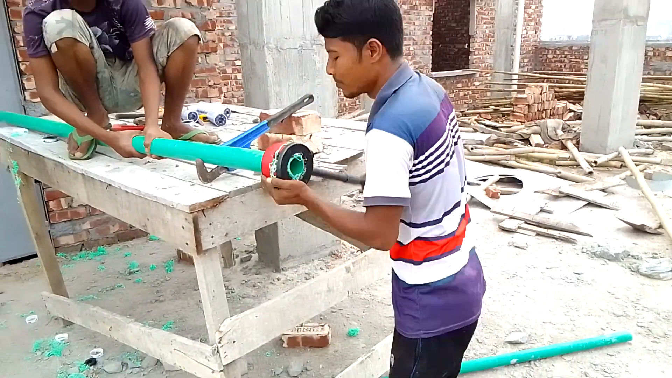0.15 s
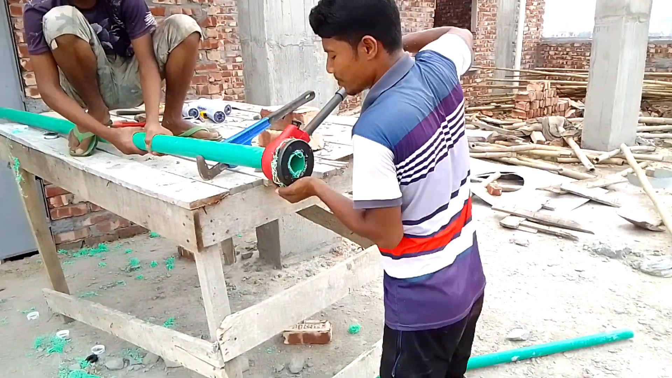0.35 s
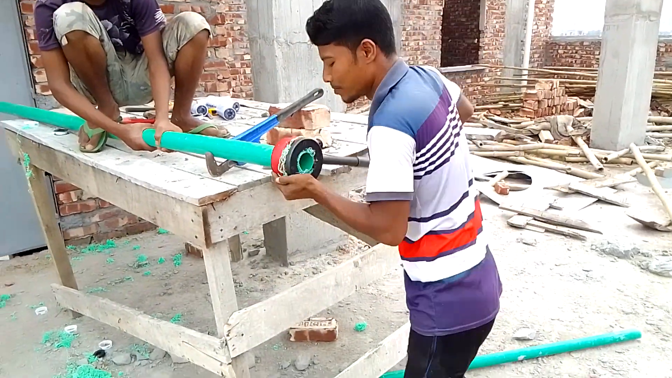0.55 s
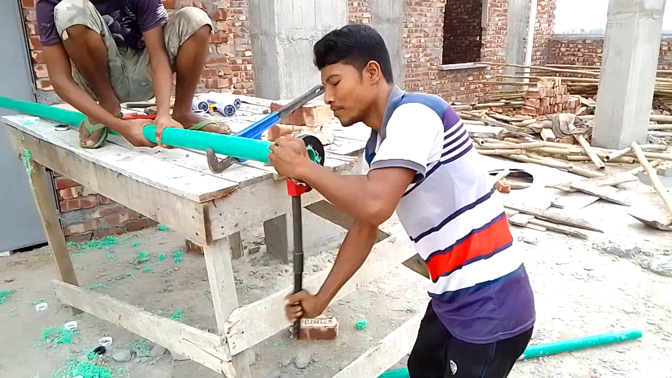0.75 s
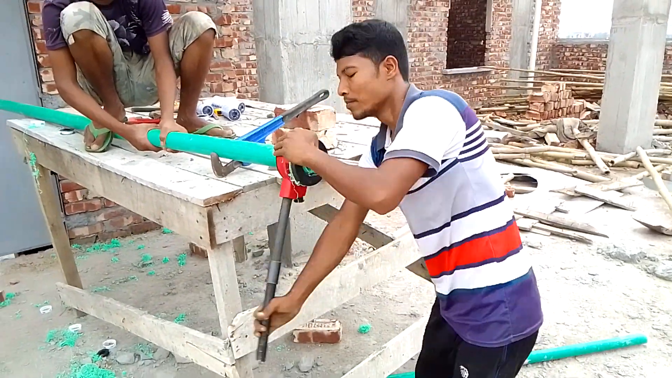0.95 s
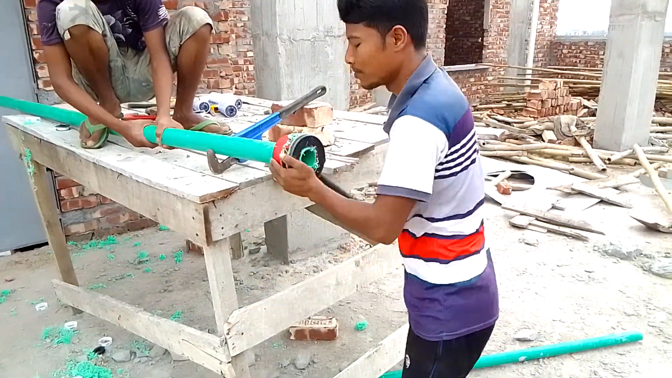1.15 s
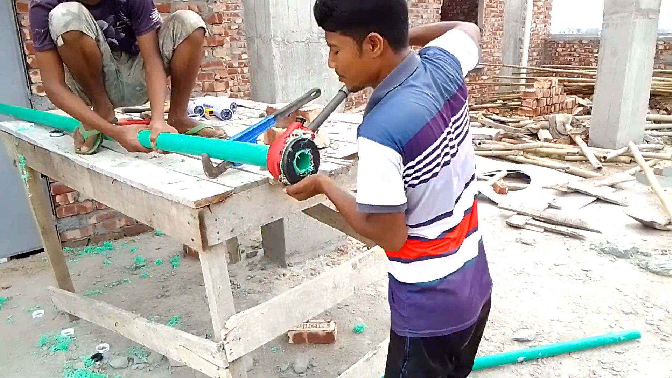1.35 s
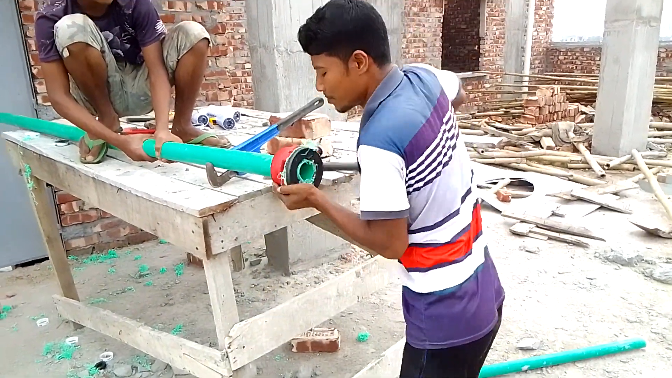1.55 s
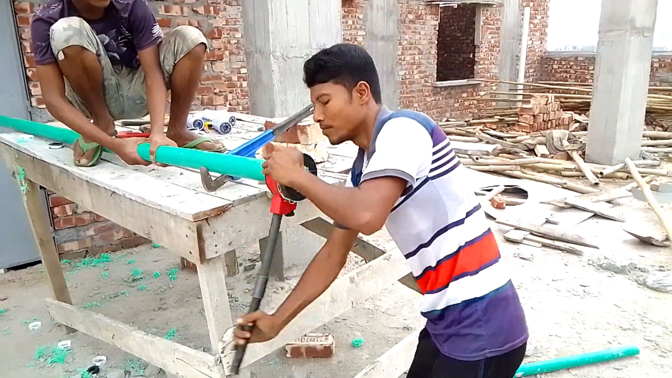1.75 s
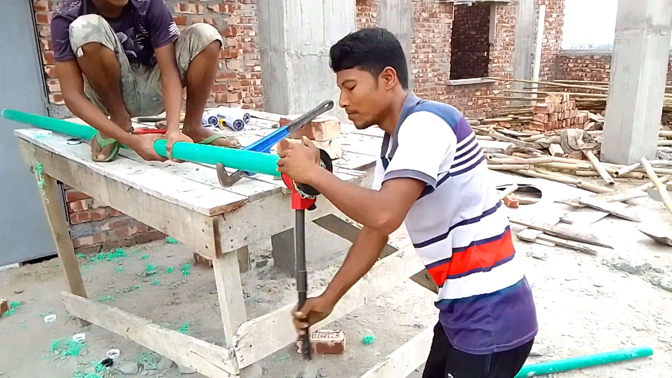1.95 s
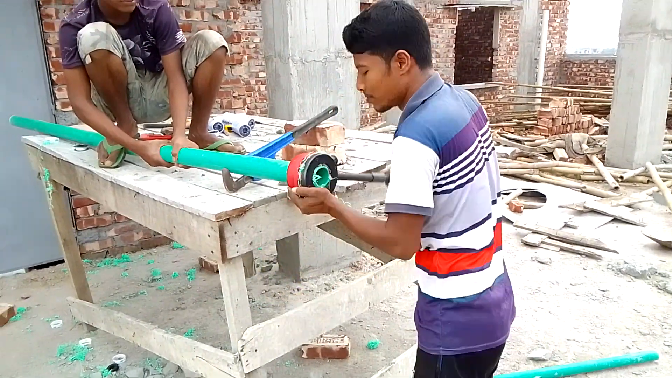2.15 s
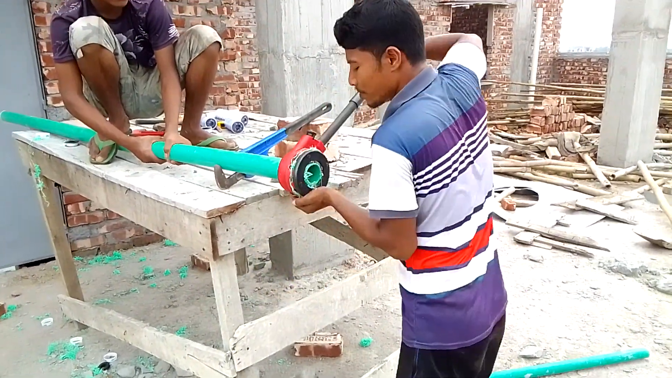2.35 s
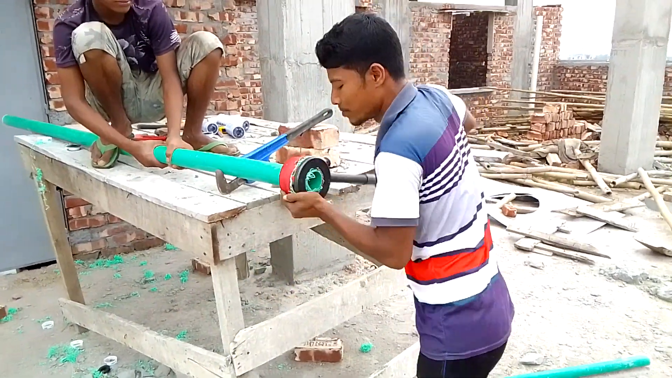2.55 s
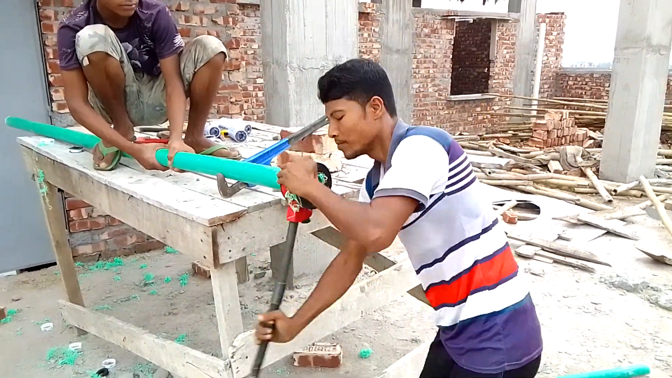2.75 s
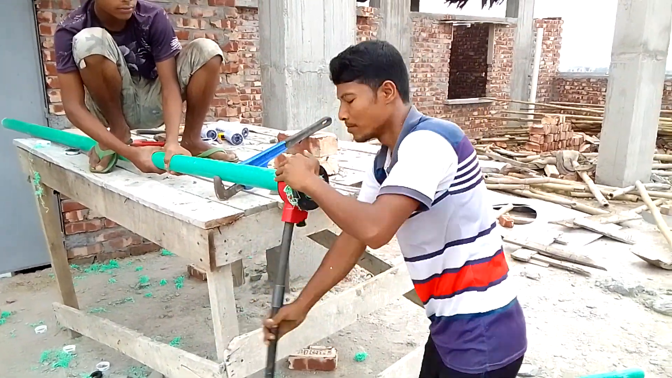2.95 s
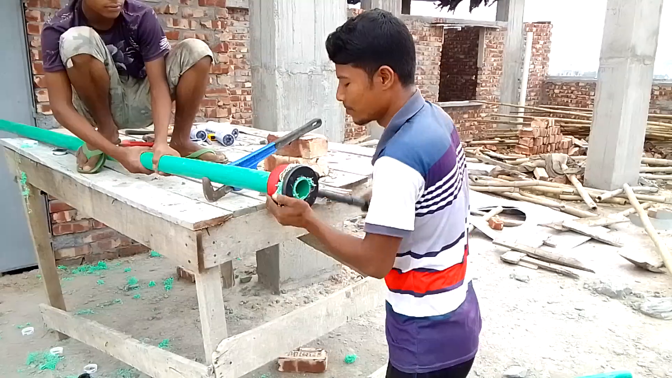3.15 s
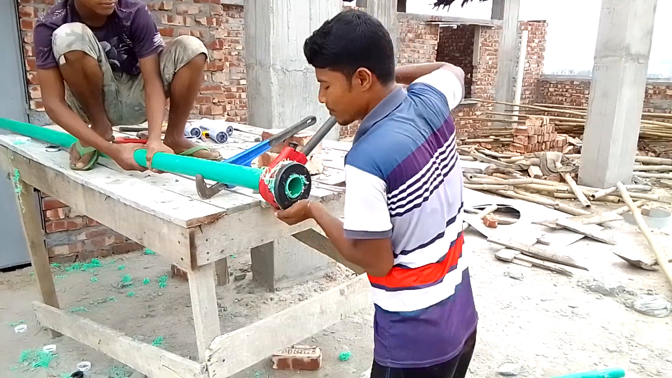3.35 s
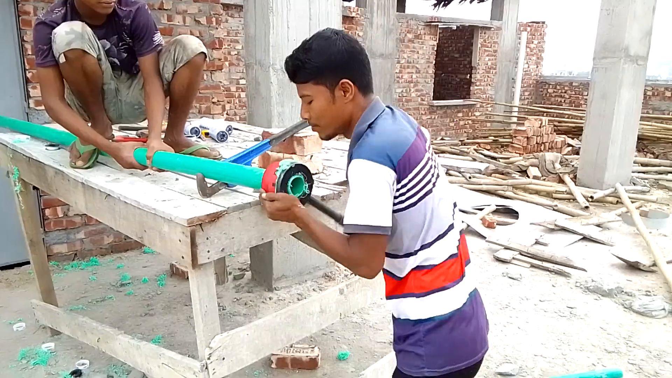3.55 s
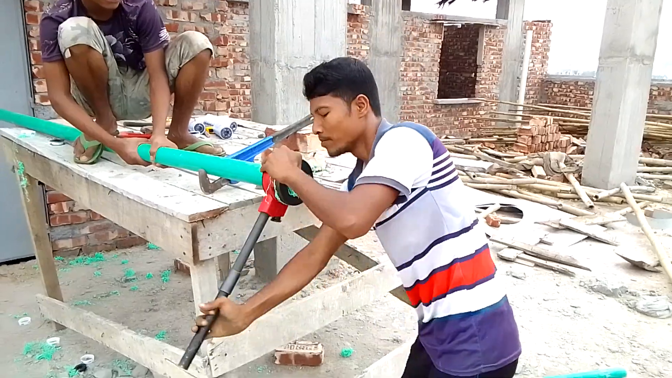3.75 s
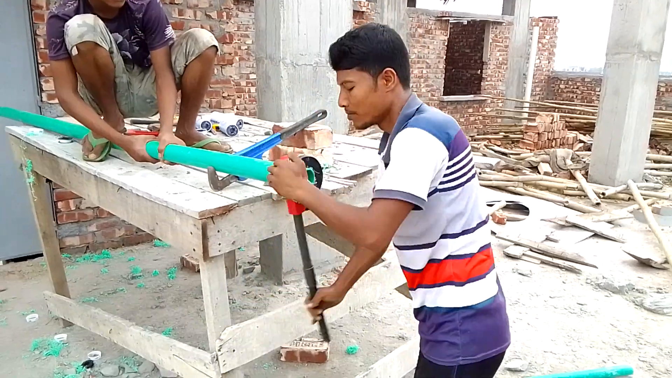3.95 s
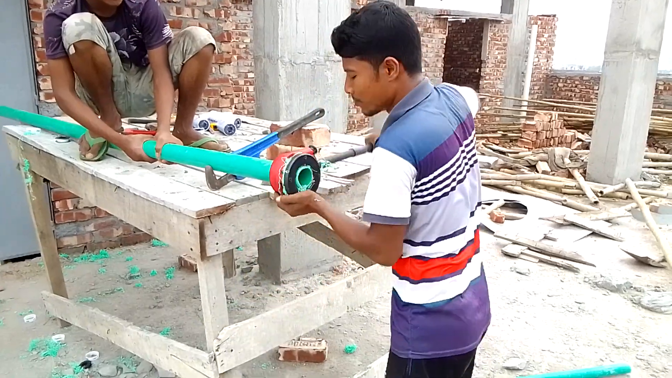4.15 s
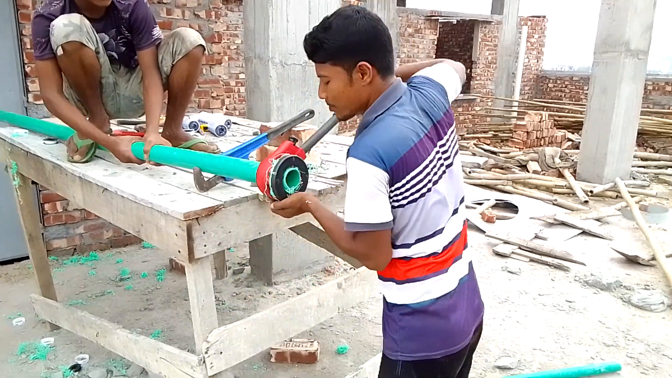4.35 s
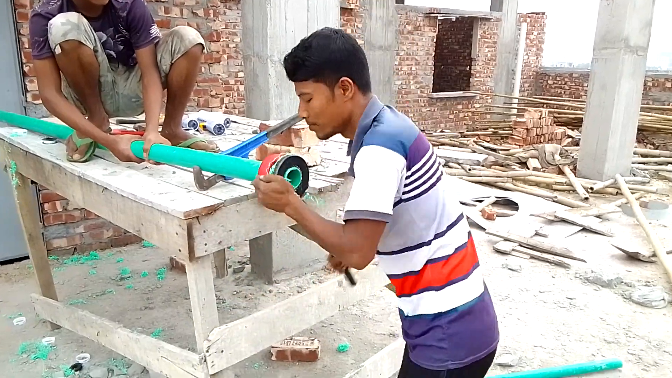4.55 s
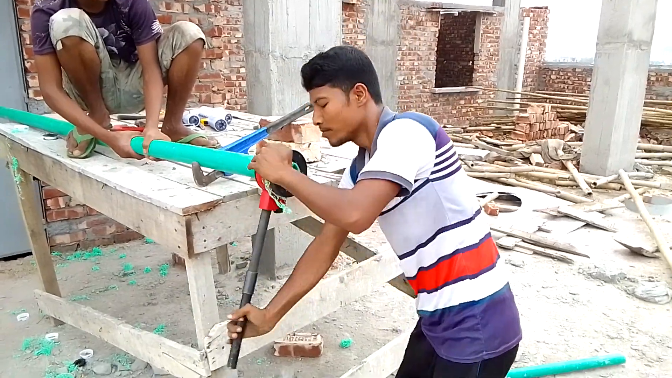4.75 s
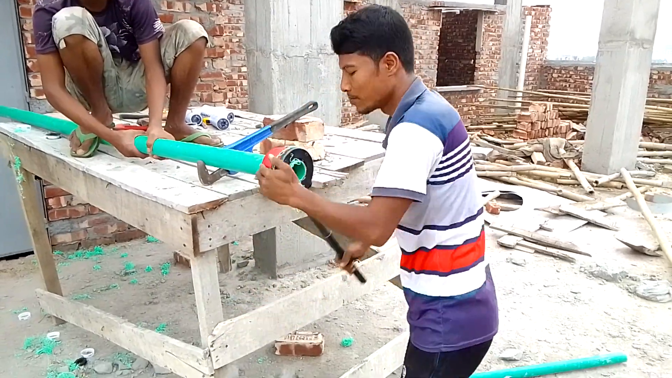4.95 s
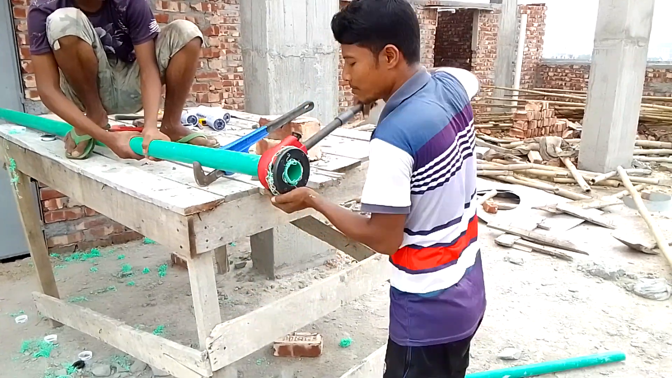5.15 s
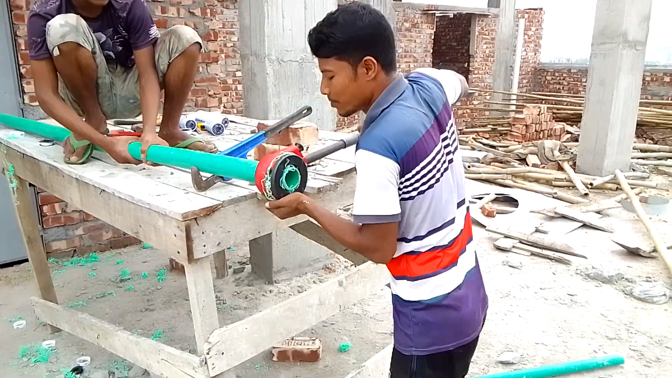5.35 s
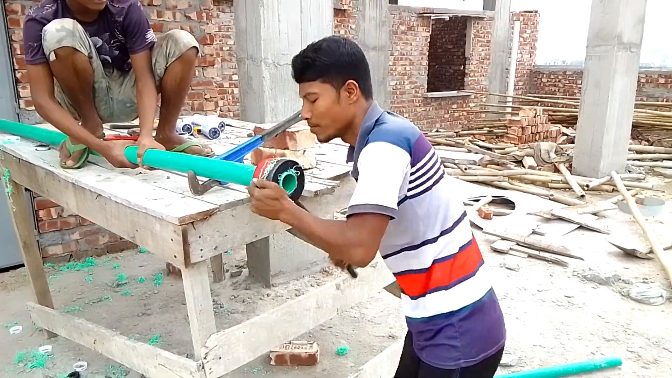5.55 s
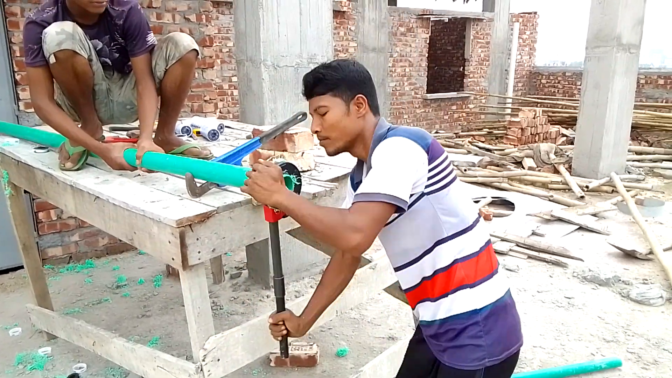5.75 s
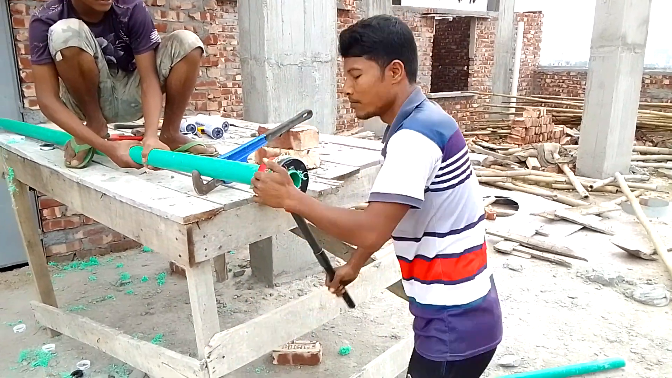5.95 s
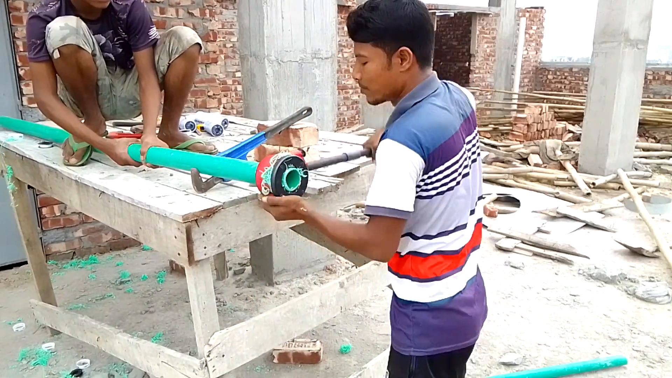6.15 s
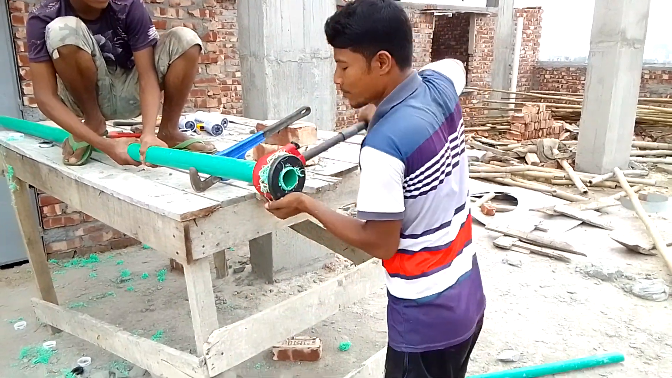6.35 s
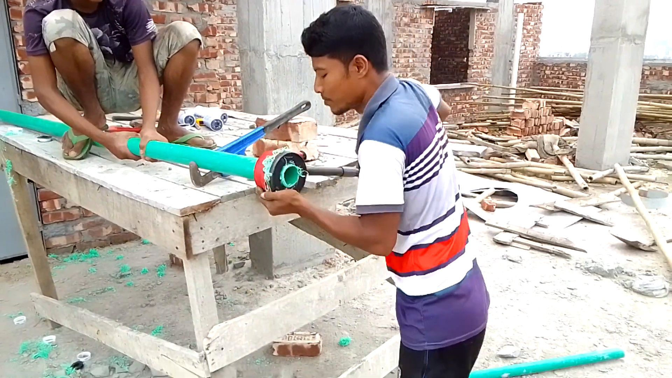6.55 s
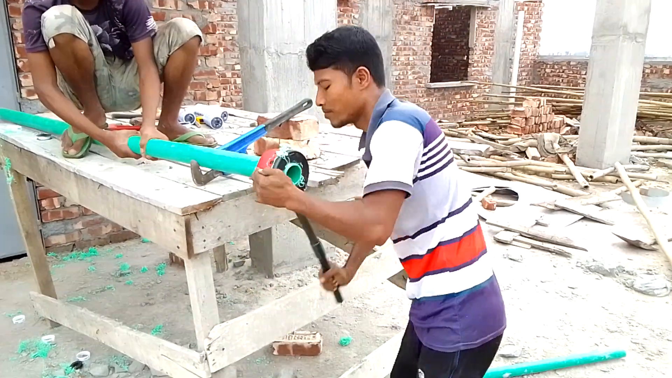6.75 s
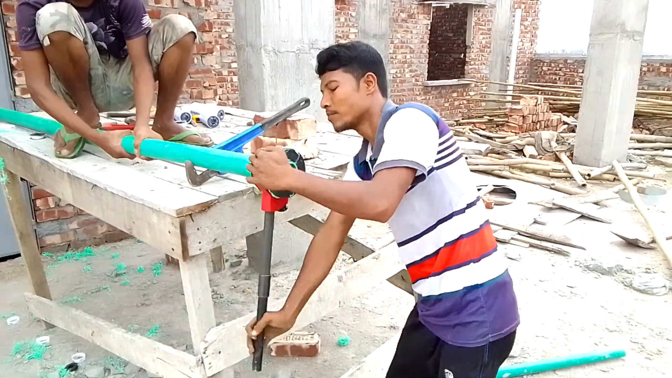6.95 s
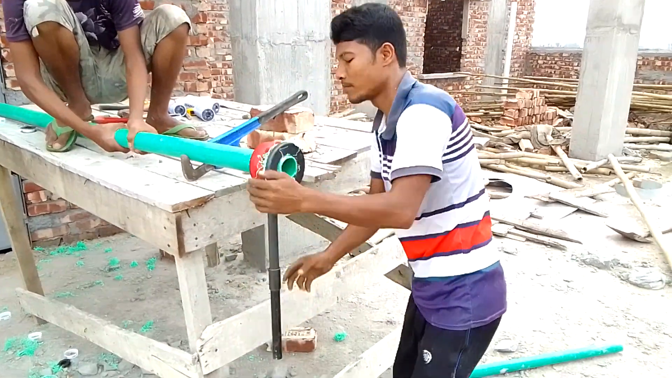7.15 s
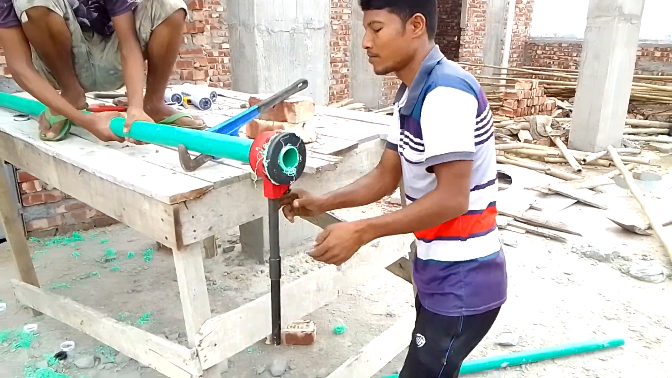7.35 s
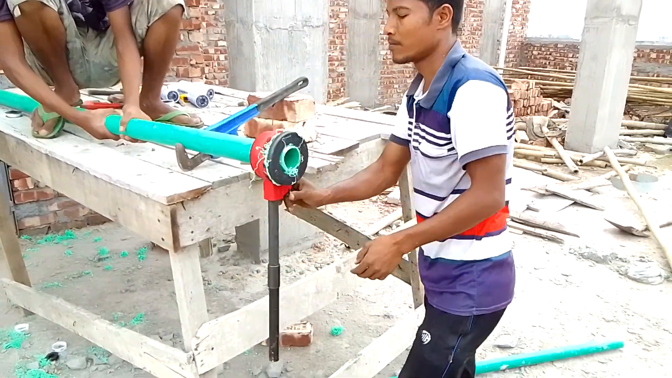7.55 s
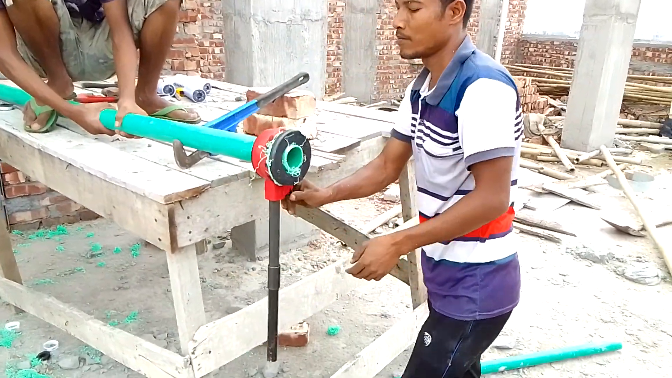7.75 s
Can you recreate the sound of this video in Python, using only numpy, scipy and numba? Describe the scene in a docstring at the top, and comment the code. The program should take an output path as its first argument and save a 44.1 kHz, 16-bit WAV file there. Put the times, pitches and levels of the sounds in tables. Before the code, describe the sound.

Seven rapid ratchet clatters, each followed by a coarse scraping stroke as the die bites into plastic, run in a steady work rhythm. Steel rings sharply with clacks and hollow pipe knocks at the turns, and the bench creaks under load. The microphone is near, in an open brick shell with a short bright echo. After seven seconds it nearly stops, leaving light scuffs, thin distant tones and muted air.

```python
"""In an open brick shell, a ratchet die threader is worked on a plastic pipe held on a wooden bench.
On each back swing the pawl drops over the teeth: short noise bursts ring the steel head.
On each down stroke the die rasps through plastic: dense tiny slips, filtered by the pipe, with bench creaks
around the strokes. Near the end come a groan, light scuffs and thin far tones. Bare walls answer briefly,
over distant air and rumble made of filtered noise."""
import sys
import numpy as np
from scipy import signal
from scipy.fft import rfft, irfft
from scipy.io import wavfile
from scipy.ndimage import uniform_filter1d
from numba import njit

SR = 44100
rng = np.random.default_rng(int(sys.argv[2]) if len(sys.argv) > 2 else 0)


def dump(signal):
    """Clip the signal to [-1, 1] and save it as 16-bit WAV at the path in sys.argv[1]."""
    limited = np.clip(np.atleast_2d(signal).T, -1, 1)
    pcm = np.round(limited * 32767).astype(np.int16)
    wavfile.write(sys.argv[1], SR, pcm)


N = 343980
TIME = np.arange(N) / SR

# Open air of the site. Each row: frequency in Hz, relative level in dB.
AIR_COLOUR = [(150, -9.5), (300, -9), (700, -17.5), (1400, -11), (2800, -20), (5500, -35.5), (8000, -28.5),
              (11000, -48.5)]
# Slow changes of the low rumble. Each row: time in seconds, level in dB before the trim in site().
RUMBLE_LEVEL = [(0, -56), (.6, -90), (1.1, -52.5), (1.9, -70.5), (5.5, -69.5), (6.0, -54), (6.6, -61),
                (7.4, -57.5), (7.8, -66)]
# Tone of the rumble. Each row: frequency in Hz, relative level in dB.
RUMBLE_COLOUR = [(20, -9.5), (45, -5.5), (75, 3.5), (120, 1), (200, -11), (500, -46)]

# Cutting strokes. Each row: time the die bites in seconds, swell length in seconds, hold length in seconds,
# fall in dB per second, rasp level in dB, chip hiss level in dB (both levels before the trims in die_cutting()).
STROKES = [(-.4, 0.32, 0.16, 194, -51, -65), (0.667, 0.13, 0.18, 168.5, -36, -59),
           (1.593, 0.17, 0.16, 220.5, -37, -54), (2.667, 0.14, 0.16, 243, -34.5, -52.5),
           (3.578, 0.079, 0.24, 276.5, -37.5, -59), (4.512, 0.11, 0.2, 261.5, -38, -51),
           (5.543, .16, 0.041, 128, -37, -59.5), (6.792, 0.19, 0.025, 147, -33, -56)]
SWELL_DB_PER_S = 102.5  # how fast the rasp grows from the bite to full speed
# Pipe wall under the die. Each row: frequency in Hz, relative level in dB.
PIPE_COLOUR = [(100, -50), (450, -23), (720, -11.5), (1000, -0.5), (1400, 1.5), (1650, -4), (2100, -1),
               (2700, -6), (3300, -30.5), (4500, -57), (9000, -49.5)]
# Pipe resonances. Each row: frequency in Hz, width in Hz, strength in dB against the pipe colour.
PIPE_MODES = [(970, 63, 6), (1296, 79, 6), (1890, 110, 3.5)]
# Thin hiss of the shavings. Each row: frequency in Hz, relative level in dB.
CHIP_COLOUR = [(2000, -14.5), (3300, 8.5), (4300, -3), (5000, 3), (5800, -5), (7000, -2), (7900, 2),
               (9000, -15.5), (11500, -24.5), (16000, -23)]
# Wooden bench under load. Each row: frequency in Hz, relative level in dB.
BENCH_COLOUR = [(25, -14), (60, -14), (105, 0.5), (180, -3), (330, 1), (450, 3), (600, -3.5), (800, -2),
                (1300, -4.5), (3000, -45)]
# The chatter climbs from slow to fast, arriving a little before the stroke eases off; it also wavers.
CHATTER_SLOW_HZ, CHATTER_FAST_HZ = 1026, 1265
CHATTER_GLIDE_S, CHATTER_LEAD_S = 0.083, 0.11
# Sound thrown back by the surroundings. Each row: frequency in Hz, relative level in dB.
WALL_COLOUR = [(150, -14), (600, -3.5), (1300, -9), (2000, -1.5), (4200, -0.5), (4850, -5.5), (5600, -2.5),
               (8000, -2.5), (15000, -2)]

# The loose head shifts on the pipe when the handle turns round. Each row: time in seconds,
# then steel ring, housing clack and pipe knock in dB, before SHIFT_DB is added.
HEAD_SHIFTS = [(0.12, -37.5, -32, -31.5), (1.141, -36.5, -34, -42), (1.173, -56, -41, -38),
               (2.086, -42, -42, -43), (2.11, -52.5, -40.5, -40), (2.589, -42, -44, -50),
               (3.094, -29, -27, -35.5), (3.127, -39, -32.5, -34.5), (3.59, -24, -30.5, -38.5),
               (4.035, -35.5, -35.5, -40), (4.062, -42, -36, -38), (4.532, -25, -33.5, -32),
               (5, -35.5, -32.5, -33), (5.814, -42, -37.5, -33.5), (5.951, -35, -39, -46.5),
               (6.07, -42, -41.5, -39.5), (6.506, -42, -44, -63), (6.553, -51, -55, -53),
               (6.629, -90, -74.5, -47.5)]
# The next five tables each hold one row of five values: steel ring, bright tick, housing clack, pipe knock,
# bench thump. First, the level in dB added to every shift of the head.
SHIFT_DB = (-2, -3.5, 1, 0, -13)
# An ordinary pawl drop, in dB.
DROP_DB = (-22, -26, -26, -28.5, -36.5)
# Share (no unit) of the first accent, when the swing starts with a jerk.
FIRST_SHARE = (0.58, .4, 0.72, 0.68, 0.11)
# Share (no unit) of the last accent, when the handle is stopped.
LAST_SHARE = (0.61, .3, 0.11, 1.29, 0.17)
# Random spread from one pawl drop to the next, in dB.
DROP_SPREAD_DB = (1.6, 0.95, 1.2, 1.9, 1.8)
# Back swings of the handle. Each row: first tooth in seconds, last tooth in seconds, number of teeth,
# braking as the share by which the last gap grows, accent of the first drop in dB, accent of the last drop in dB,
# then level changes in dB for steel ring, bright tick, housing clack and pipe knock.
SWINGS = [(0.175, 0.459, 7, .29, 5, 0.5, 0, 0.5, -0.5, 2),
          (1.204, 1.538, 8, 0.73, 9, 10.5, -1, -.5, -3, -3),
          (2.141, 2.458, 8, 0.54, 0, 4, 0.5, 1, -1.5, 1.5),
          (3.155, 3.444, 8, 0.46, 11.5, 3, -1, -2, -0.5, -2), (4.090, 4.4, 8, .45, 3, 0, 0, 1, -1.5, 0.5),
          (5.062, 5.35, 7, 0.25, 0, -1, 1.5, 1.5, -0.5, 1.5),
          (6.157, 6.382, 5, .08, 9.5, 0.5, 1.5, 1.5, -1.5, -.5)]
# The first gap between teeth grows by this share; starting and braking fade by SWING_EASE per tooth.
SWING_START, SWING_EASE = .06, .34
# Ringing of the head on its pipe. Each row: frequency in Hz, width in Hz, strength in dB
# against the contact colour (frequency and strength vary a little with each drop).
HEAD_MODES = [(1305, 120, 13.5), (2153, 250, 9), (2300, 89, 9), (2590, 270, 15.5), (2760, 630, 10),
              (4030, 54, -8), (4900, 48, 19), (4998, 110, 24), (5130, 200, 9), (7650, 350, -2.5),
              (8337, 120, 15.5), (10860, 68, 17.5), (13900, 83, 6.5), (15100, 150, -0.5), (15700, 130, 8)]
# Broad tone of steel contact. Each row: frequency in Hz, relative level in dB.
CONTACT_COLOUR = [(25, -9), (100, -4.5), (350, -4), (650, -4.5), (1000, -3.5), (2000, -8.5), (3200, -14),
                  (5300, -10), (6200, -14.5), (7700, -7), (9000, -16.5), (11500, -21.5), (16000, -11.5)]
# Rattle of the loose dies. Each row: frequency in Hz, relative level in dB.
RATTLE_COLOUR = [(150, -13), (600, -8), (1200, 2), (2700, 0), (3600, -6.5), (5000, -10.5), (8000, -16),
                 (15000, -22.5)]

# The bench creaks as it takes or sheds load. Each row: start in seconds, length in seconds, relative level in dB.
CREAKS = [(0.582, 0.059, -41.5), (1.093, .07, -49.5), (1.601, 0.078, -55), (2.572, 0.057, -44),
          (3.61, 0.025, -39.5), (4.545, 0.066, -46.5), (5.475, 0.052, -41), (5.808, .06, -37.5),
          (5.935, .2, -50.5), (6.481, 0.025, -46.5), (6.539, 0.028, -47), (6.619, 0.018, -48.5)]
# Groan of the last slow stroke. Each row: time in seconds, pitch in Hz, level in dB.
GROAN = [(6.66, 326, -64), (6.76, 290, -52.5), (6.841, 402, -49), (6.908, 440, -43), (6.97, 510, -61),
         (7.04, 484, -56)]
# Small scuffs as the tool is let go. Each row: time in seconds, level in dB.
SCUFFS = [(7.15, -61.5), (7.348, -68.5), (7.614, -62), (7.643, -68), (7.67, -57.5)]
# Faint tones from far across the site. Each row: start in seconds, end in seconds, middle pitch in Hz,
# middle level in dB (both waver).
FAR_TONES = [(7.219, 7.50, 3660, -76), (7.432, 7.82, 1710, -71.5)]
# Microphone treble, with a deep notch from its port. Each row: frequency in Hz, level in dB.
MICROPHONE_COLOUR = [(7000, -2.5), (8400, -2.5), (9000, -5), (9600, -14), (10150, -18.5), (10750, -5),
                     (11300, -5.5), (12500, -6)]
TOP_HZ = 15600  # where the treble is cut off


def undb(db):
    """Turn decibels into gain."""
    return 10 ** (np.asarray(db) / 20)


def unit(x):
    """Scale to an average strength (rms) of 1."""
    return x / np.sqrt(np.mean(x ** 2) + 1e-20)


def colour(x, points, modes=()):
    """Filter by a broad colour with resonances on it; nothing sounds before its cause, so hits stay sharp."""
    f = np.fft.rfftfreq(len(x), 1 / SR) + 1
    hz, db = np.transpose(points)
    broad = undb(np.interp(np.log(f), np.log(hz), db))
    peaks = 1 + sum(undb(d) ** 2 / (1 + (2 * (f - c) / w) ** 2) for c, w, d in modes)
    # folding the cepstrum gives the minimum-phase filter of this shape
    cepstrum = irfft(np.log(broad * np.sqrt(peaks)))
    cepstrum[1:len(x) // 2] *= 2
    cepstrum[len(x) // 2 + 1:] = 0
    return irfft(rfft(x) * np.exp(rfft(cepstrum)), len(x))


@njit
def resonate(x, hz, width):
    """Ring one resonance (a state-variable band-pass) whose pitch can move; width is in Hz."""
    y, band, low = np.empty(len(x)), 0., 0.
    for i in range(len(x)):
        g, k = np.tan(np.pi * hz[i] / SR), width / hz[i]
        v = (band + g * (x[i] - low)) / (1 + g * (g + k))
        band, low, y[i] = 2 * v - band, low + 2 * g * v, k * v
    return y


def walk(rate):
    """Smooth random wandering with a spread near 1, from this many new values per second."""
    k = max(int(SR / rate), 2)
    steps = np.repeat(rng.standard_normal(N // k + 1), k)
    return 1.3 * uniform_filter1d(uniform_filter1d(steps, k), k)[:N]


def slips(rate, spread_db):
    """Surfaces stick and slip: random tiny clicks of uneven size, this many per second on average."""
    clicks = (rng.random(N) < rate / SR) * rng.choice([-1, 1], N)
    return clicks * undb(spread_db * rng.standard_normal(N))


def add(track, s, sound):
    """Mix a sound in at time s in seconds."""
    i = max(int(s * SR), 0)
    track[i:i + len(sound)] += sound[:N - i]


def gate(start, end, attack_s, release_s):
    """Rise from start, hold until end, then fade."""
    return np.clip((TIME - start) / attack_s, 0, 1) * np.exp(-np.maximum(TIME - end, 0) / release_s)


def site(air_db=-64, rumble_db=-1):
    """Distant outdoor wash over a wavering rumble, both filtered noise."""
    air = unit(colour(rng.standard_normal(N), AIR_COLOUR)) * undb(air_db + walk(2.0))
    rumble = unit(colour(rng.standard_normal(N), RUMBLE_COLOUR))
    return air + rumble * undb(np.interp(TIME, *np.transpose(RUMBLE_LEVEL)) + rumble_db)


def current_stroke():
    """Give the columns of the latest stroke to have bitten, at each moment."""
    rows = np.array(STROKES)
    return rows[np.maximum(np.searchsorted(rows[:, 0], TIME) - 1, 0)].T


def stroke_gains(bite_s=0.016):
    """Gains of rasp and chip hiss: each stroke swells, holds and dies away as the push ends."""
    rasp, chips = np.zeros(N), np.zeros(N)
    for bite, swell, hold, fall, rasp_db, chips_db in STROKES:
        age = TIME - bite
        swell_db = -SWELL_DB_PER_S * np.maximum(swell - age, 0)
        fall_db = -fall * np.maximum(age - swell - hold, 0)
        # the fade-in ends at the bite
        effort = undb(swell_db + fall_db) * np.clip(1 + age / bite_s, 0, 1)
        rasp += undb(rasp_db) * effort
        chips += undb(chips_db) * effort
    return rasp, chips


def sweep(x, start_s=.005, closing_per_s=1.5, share=.72):
    """The worker leans in during each stroke: reflections come ever sooner, and their comb glides upward."""
    age = np.maximum(TIME - current_stroke()[0], 0)
    lag = start_s * np.exp(-closing_per_s * age)
    once = np.interp(TIME - lag, TIME, x)
    twice = np.interp(TIME - 2 * lag, TIME, x)
    return x + share * once + share ** 2 * twice


def die_cutting(rasp_db=-1, chatter_db=-3, chips_db=-2, bench_db=-21):
    """Die teeth tear the plastic in tiny slips; the chatter climbs with the push and the bench murmurs along."""
    bite, swell, hold, *_ = current_stroke()
    ease = bite + swell + hold
    glide = np.interp(TIME - ease + CHATTER_LEAD_S, [-CHATTER_GLIDE_S, 0], [CHATTER_SLOW_HZ, CHATTER_FAST_HZ])
    chatter_hz = glide * (1 + 0.051 * walk(25))
    rasp_gain, chips_gain = stroke_gains()
    tearing = slips(5000, 4.5) * undb(2.0 * walk(90))
    wall = unit(sweep(colour(tearing, PIPE_COLOUR, PIPE_MODES)))
    chatter = resonate(colour(slips(3000, 3), PIPE_COLOUR), chatter_hz, 70.)
    rasp = unit(wall + undb(chatter_db) * unit(chatter)) * rasp_gain
    chips = unit(colour(tearing, CHIP_COLOUR)) * chips_gain
    wood = unit(colour(slips(800, 2.9), BENCH_COLOUR)) * rasp_gain
    return undb(rasp_db) * rasp + undb(chips_db) * chips + undb(bench_db) * wood


def walls(x, near_db=-5, near_t60=0.2, far_db=-21, far_t60=0.95, far_top_hz=2500, first_s=0.0085, count=5):
    """Quick bright scatter that changes as the tool moves, then a faint duller tail from the brick shell."""
    t = TIME[:SR]

    def tail(t60):
        """Noise that falls by 60 dB in t60 seconds, after a short wait."""
        return rng.standard_normal(SR) * np.exp(-np.log(1000) * t / t60) * (t > first_s)

    def echo(sound, response):
        """Let the sound echo through one response."""
        return signal.fftconvolve(sound, unit(response) / np.sqrt(SR))[:N]

    x = colour(x, WALL_COLOUR)
    # wandering shares of the sound, with steady total power
    paths = np.array([walk(12) for _ in range(count)])
    paths /= np.linalg.norm(paths, axis=0)
    # only one echo in twenty is kept, so the near scatter is sparse
    near = sum(echo(x * path, tail(near_t60) * (rng.random(SR) < .05)) for path in paths)
    dull = signal.butter(1, far_top_hz, fs=SR, output="sos")
    far = signal.sosfilt(dull, echo(x, tail(far_t60)))
    return undb(near_db) * near + undb(far_db) * far


def head_shifts():
    """Time and part levels of each head shift; the tick follows the steel, the bench follows the pipe."""
    return [(s, np.add(SHIFT_DB, [ring, ring, clack, knock, knock])) for s, ring, clack, knock in HEAD_SHIFTS]


def tooth_drops():
    """Time and part levels of each tooth; teeth pass evenly in mid swing, slower at the start and in braking."""
    drops = []
    for first, last, teeth, braking, first_db, last_db, ring, tick, clack, knock in SWINGS:
        fading = SWING_EASE ** np.arange(round(teeth) - 1)
        gaps = 1 + SWING_START * fading + braking * fading[::-1]
        travel = np.append(0, np.cumsum(gaps))
        levels = np.zeros((len(travel), 1)) + np.add(DROP_DB, [ring, tick, clack, knock, 0])
        levels[0] += first_db * np.array(FIRST_SHARE)
        levels[-1] += last_db * np.array(LAST_SHARE)
        drops += zip(first + (last - first) * travel / travel[-1], levels)
    return drops


def pawl_slide(slide_db=-20, climb_s=.014):
    """Before each blow the metal scrapes, ever louder, up to the edge that it drops from."""
    push = np.zeros(N)
    ramp = np.exp(np.arange(-4096, 0) / SR / climb_s)
    for s, (_, _, housing_db, *_) in tooth_drops() + head_shifts():
        add(push, s - len(ramp) / SR, ramp * undb(housing_db + slide_db))
    return push * unit(colour(slips(2500, 4.2), PIPE_COLOUR, HEAD_MODES))


def pawl_drop(t, drag, bounce_s=0.0046, grit_db=2, shift=0.011, detune=0.011, ring_spread_db=3):
    """The pawl lands and rebounds; two brief rattles ring the head a little differently for each drop."""
    gap, size, grip = rng.standard_normal(3)
    rise_s, rattle_s, bounce_db = .0005, .0032, -3.5

    def landing(age):
        """A quick rise and fall of force; drag makes it last longer."""
        return np.exp(-age / (rattle_s * drag)) * (1 - np.exp(-age / (rise_s * drag ** 2)))

    rebound = landing(np.maximum(t - bounce_s * np.exp(0.17 * gap), 0))
    force = landing(t) + undb(bounce_db + 2 * size) * rebound
    rattle = force * rng.standard_normal(len(t)) * undb(grit_db * rng.standard_normal(len(t)))
    # the grip of the die on the pipe moves all the rings together
    chance = rng.standard_normal((len(HEAD_MODES), 2))
    modes = [(hz * (1 + shift * grip + detune * a), w, db + ring_spread_db * b)
             for (hz, w, db), (a, b) in zip(HEAD_MODES, chance)]
    return colour(rattle, CONTACT_COLOUR, modes)


def blows(events, spread_db, firm_db=-28, drag_per_db=0.36):
    """Every blow is shared between steel, housing, pipe and bench, as the tool happens to sit."""
    out, t = np.zeros(N), np.arange(4096) / SR
    # bands in Hz: steel ring, bright tick, housing clack, pipe knock, bench thump
    parts = [((3800, 6200), "band"), (6200, "high"), ((1800, 3800), "band"), ((700, 1800), "band"), (700, "low")]
    filters = [signal.butter(3, hz, kind, fs=SR, output="sos") for hz, kind in parts]
    attack = t < .012
    for s, levels in events:
        # a light touch scrapes on for longer than a firm drop
        drop = pawl_drop(t, np.clip(1.5 + drag_per_db * (firm_db - levels[0]), 1, 2))
        part_db = levels + spread_db * rng.standard_normal(len(parts))
        for sos, db in zip(filters, part_db):
            part = signal.sosfilt(sos, drop)
            add(out, s, part * undb(db) / np.std(part[attack]))
    return out


def ratchet():
    """The pawl drops over the teeth, never twice alike; the loose head knocks at the turns."""
    return blows(tooth_drops(), np.array(DROP_SPREAD_DB)) + blows(head_shifts(), 0)


def loose_rattle(rattle_db=-46, early_s=.05, attack_s=0.056, release_s=0.17, fade_db_per_s=18):
    """Dies tick in their slots as the handle swings free, most near the start and in swings with more clack."""
    swinging = np.zeros(N)
    for first, last, *_, clack_db, _ in SWINGS:
        fade_db = fade_db_per_s * np.maximum(TIME - first, 0)
        swinging += gate(first - early_s, last, attack_s, release_s) * undb(clack_db - fade_db)
    ticks = unit(colour(slips(700, 5), RATTLE_COLOUR, HEAD_MODES))
    return undb(rattle_db) * swinging * ticks


def creaks(attack_s=.02, release_s=0.032, grind_db=-3, jerk_db=2.0):
    """The bench joints slip in jerks under the changing load while the pipe grinds in its hold."""
    load = sum(undb(db) * gate(s, s + length, attack_s, release_s) for s, length, db in CREAKS)
    wood = unit(colour(slips(600, 0.9), BENCH_COLOUR))
    grind = unit(colour(slips(1500, 3.5), PIPE_COLOUR, PIPE_MODES))
    jerks = unit(undb(jerk_db * walk(70)))
    return load * jerks * (wood + undb(grind_db) * grind)


def groan(width_hz=130.):
    """Slow slips ring one low resonance that mostly rises as the last stroke gathers speed."""
    s, hz, db = np.transpose(GROAN)
    centre = np.interp(TIME, s, hz)
    # ringing twice makes the tone purer
    tone = resonate(resonate(slips(900, 2), centre, width_hz), centre, width_hz)
    return unit(tone) * undb(np.interp(TIME, s, db, left=-np.inf, right=-np.inf))


def scuffs(decay_s=0.01):
    """Faint gritty scrapes: tiny slips that start suddenly and die away."""
    push = sum(undb(db) * (TIME > s) * np.exp(-np.abs(TIME - s) / decay_s) for s, db in SCUFFS)
    return unit(colour(slips(3400, 3.5), CHIP_COLOUR)) * push


def far_tones(waver=.007):
    """Thin sine tones, wavering in pitch and level, that swell and fade in the distance."""
    out = np.zeros(N)
    for start, end, hz, db in FAR_TONES:
        progress = np.clip((TIME - start) / (end - start), 0, 1)
        swell = np.abs(np.sin(np.pi * progress)) ** .5
        phase = 2 * np.pi * np.cumsum(hz * (1 + waver * walk(40))) / SR
        out += swell * undb(db + 2 * walk(20)) * np.sin(phase)
    return out


def scene():
    """Add up the tool, its echoes and the site."""
    tool = die_cutting() + pawl_slide() + ratchet() + loose_rattle() + creaks() + groan() + scuffs()
    return (site() + tool + walls(tool) + far_tones())[None]


def record(dry):
    """The microphone colours the treble, cuts the top and sits slightly off zero."""
    offset = .0023
    low_pass = signal.ellip(8, .2, 70, TOP_HZ, fs=SR, output="sos")
    return signal.sosfilt(low_pass, colour(dry[0], MICROPHONE_COLOUR))[None] + offset


dry = scene()
out = record(dry)
dump(out)
```